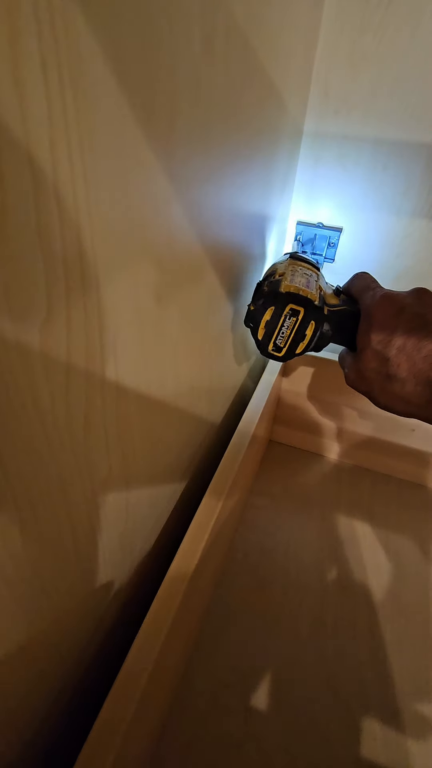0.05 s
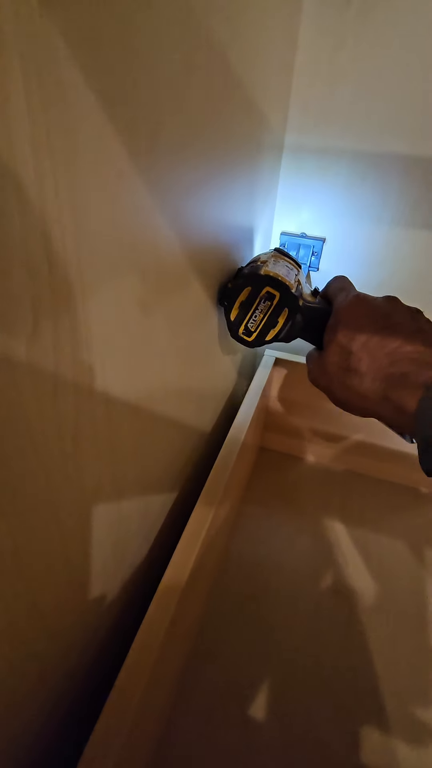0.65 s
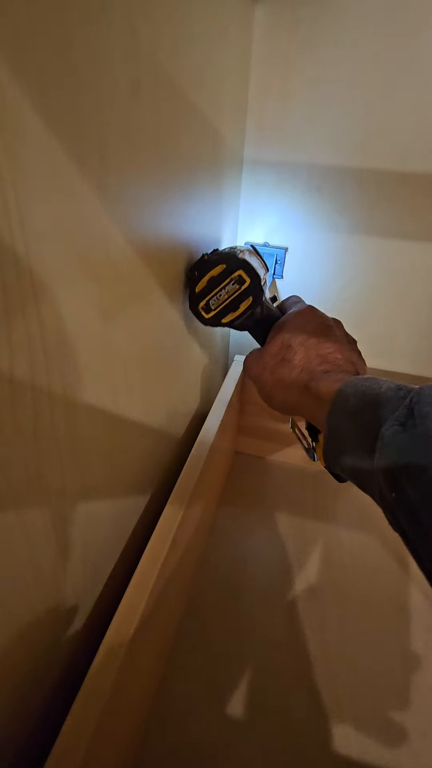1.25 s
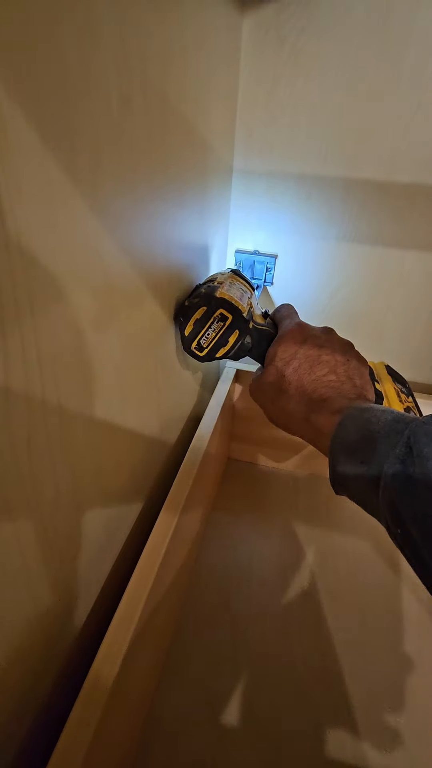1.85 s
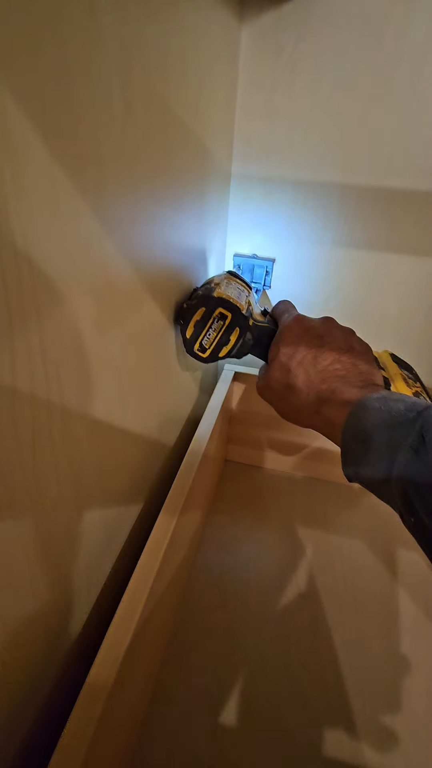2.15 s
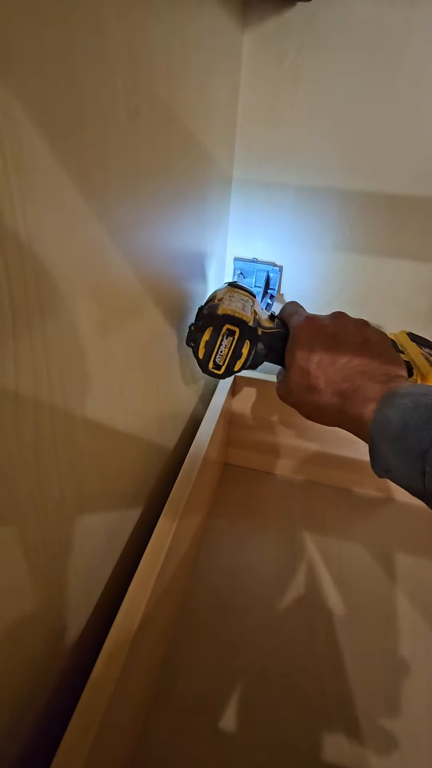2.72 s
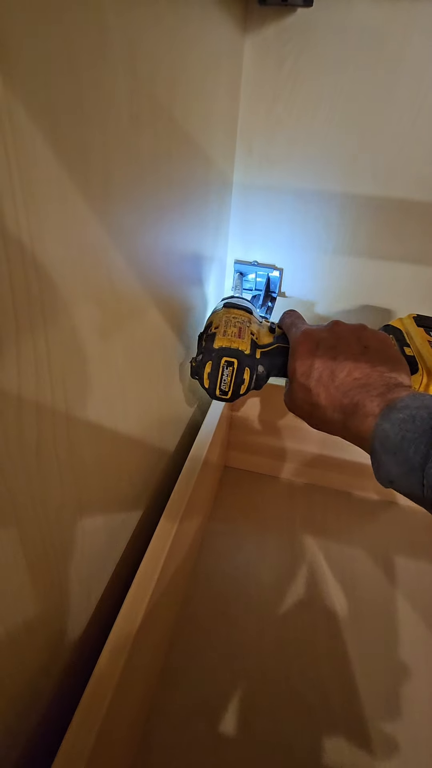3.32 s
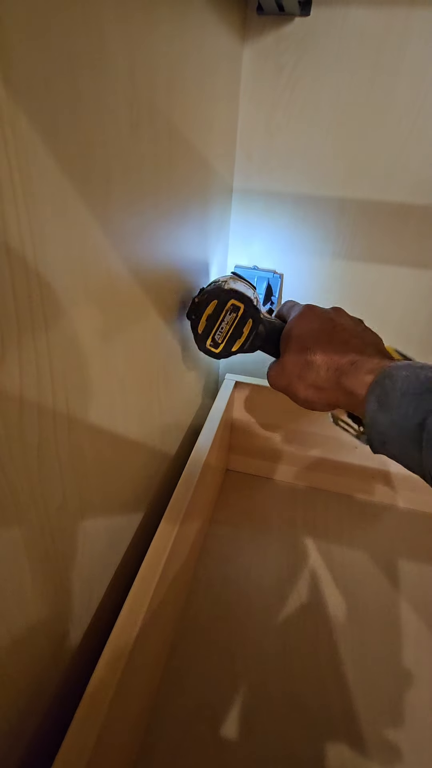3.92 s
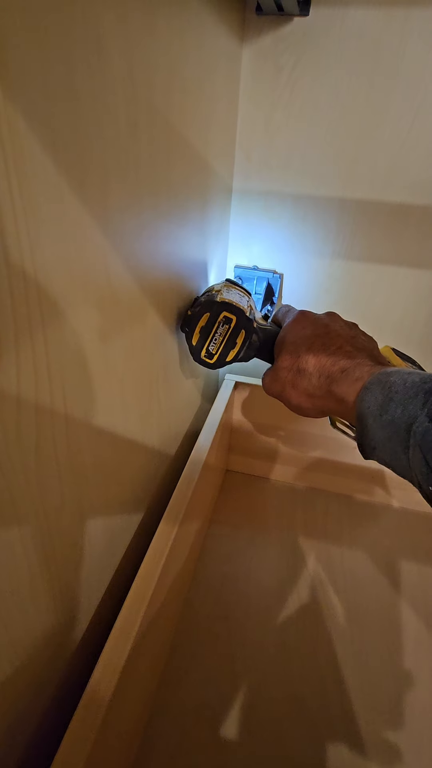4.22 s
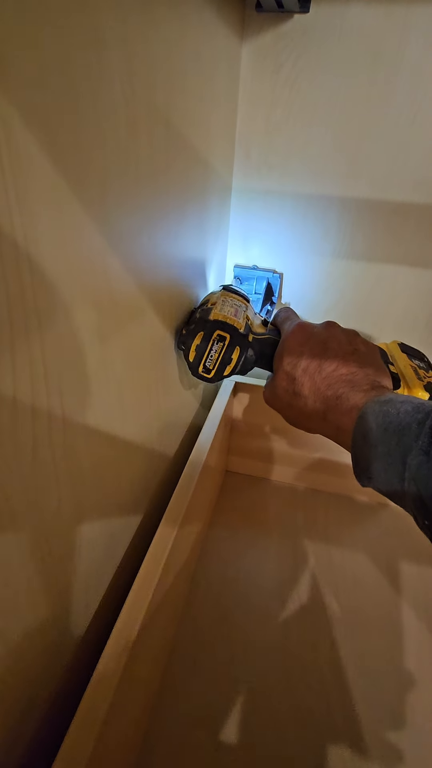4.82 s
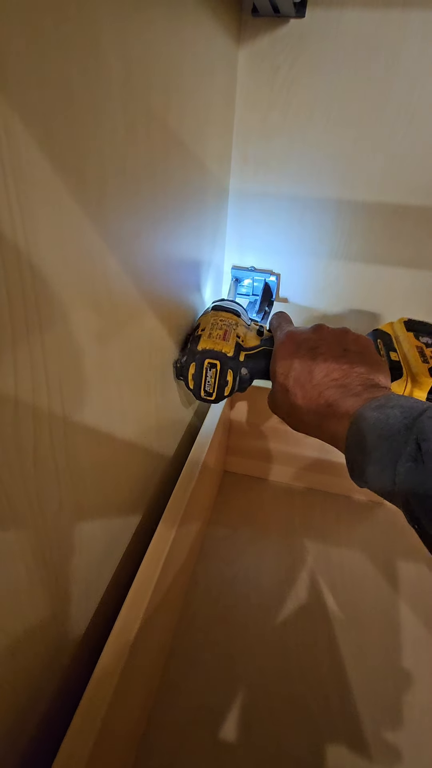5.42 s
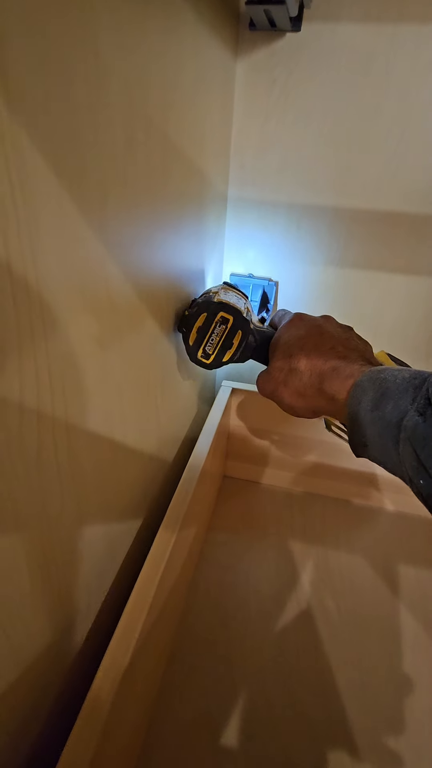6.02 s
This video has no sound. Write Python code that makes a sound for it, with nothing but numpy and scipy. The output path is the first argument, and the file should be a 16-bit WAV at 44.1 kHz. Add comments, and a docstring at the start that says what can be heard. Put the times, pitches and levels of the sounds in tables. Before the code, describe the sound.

Hollow bumps on wood and clicks of a loose steel drawer slide surround three brief pulls of a cordless screwdriver.

```python
"""A cordless driver backs screws out of a steel drawer slide, deep inside a wooden cabinet.
First the tool bumps and rubs the wood, the bit taps the bracket in search of the screw and the loose
slide clacks. The motor gives two short pulls, the bit scratches, and the rail slaps in its track.
The bit chafes in the screw head, a third pull runs faster and louder, and a few last knocks follow.
The touches ring panel, boards, rail, bracket and bit; the cabinet and a small room throw it all back."""
import sys
import numpy as np
from scipy import signal
from scipy.io import wavfile
from scipy.ndimage import uniform_filter1d

SR = 44100
rng = np.random.default_rng(int(sys.argv[2]) if len(sys.argv) > 2 else 0)


def store_pcm(level_fs):
    """Save levels as 16-bit WAV."""
    pcm = np.round(np.clip(level_fs, -1, 1) * 32767).astype(np.int16)
    wavfile.write(sys.argv[1], SR, np.atleast_2d(pcm).T)


N = 267687

# spectrum of a dead blow on heavy wood: freq_hz, level_db
THUD = [(25, -16), (55, 4), (130, 5.5), (220, -8.5), (400, -30), (1000, -77.5)]
# a harder touch favours light steel; share of the hardness for: panel, boards, rail, bracket, bit
LIGHTNESS = np.array([0, 0, .65, 1, 1])


def amp(db):
    """Decibels to gain."""
    return 10 ** (np.asarray(db) / 20)


def unit(x):
    """Scales to rms 1."""
    return x / np.sqrt(np.mean(x ** 2) + 1e-20)


def read(points, hz):
    """Reads (freq_hz, value) points on a log-frequency axis."""
    freqs, values = np.transpose(points)
    return np.interp(np.log(hz + 1), np.log(freqs + 1), values)


def add(mix, start_s, sound):
    """Lays a stereo sound into the mix."""
    part = mix[:, max(round(start_s * SR), 0):][:, :sound.shape[1]]
    part += sound[:, :part.shape[1]]


def drift(length, hz):
    """A random wander of rms 1 that turns hz times a second."""
    knots = rng.standard_normal(8192)
    return unit(np.interp(np.arange(length) * hz / SR, np.arange(len(knots)), knots))


def colour(spectrum, size=4096):
    """A minimum-phase click of energy 1 with the given spectrum."""
    log_gain = np.log(amp(read(spectrum, abs(np.fft.fftfreq(size, 1 / SR)))))
    click = np.fft.ifft(np.exp(np.conj(signal.hilbert(log_gain)))).real[:size // 2]
    return click / np.linalg.norm(click)


def convolve(x, response):
    """Plays a sound through a stereo response."""
    return signal.fftconvolve(np.atleast_2d(x), response, axes=1)


def room_tone(air_db=-54.5, width=0.28, hum_hz=48.6, hum_db=-47.5):
    """A still room with a low, distant hum."""
    # the dark noise bed: freq_hz, level_db
    bed = [(12, -33.5), (20, -5.5), (70, -3.5), (127, -10), (204, -21.5), (301, -14.5), (377, -27),
           (660, -28.5), (1290, -35), (3340, -46), (7310, -49), (10200, -65), (16000, -74.5)]
    noise = rng.standard_normal((3, N))
    centre, left, right = signal.fftconvolve(noise, colour(bed)[None], "same", axes=1)
    hum = np.sqrt(2) * np.sin(2 * np.pi * hum_hz * np.arange(N) / SR) * amp(drift(N, 1.7))
    return amp(air_db) * unit(centre + width * np.array([left, right])) + amp(hum_db) * hum


def echoes(decays, length_s, low_hz, attack_s=0.0022):
    """Dense stereo reflections of energy 1 above low_hz; each band dies at its own speed."""
    hz, t, bands = signal.stft(rng.standard_normal((2, int(length_s * SR))), SR, nperseg=256)
    bands = bands * amp(-60 * t / read(decays, hz)[:, None])
    tail = signal.istft(bands, SR, nperseg=256)[1]
    tail = signal.sosfilt(signal.butter(2, low_hz, "high", fs=SR, output="sos"), tail)
    tail = tail * np.minimum(np.arange(tail.shape[1]) / (attack_s * SR), 1)
    return tail / np.linalg.norm(tail, axis=1, keepdims=True)


def room_tail(sound, wet_db=-19):
    """The small room answers with a faint reverb."""
    # decay of the room: freq_hz, t60_s
    decays = [(300, 0.46), (800, 0.71), (1500, 0.51), (2500, 0.28), (5000, 0.27), (14000, 0.31)]
    return amp(wet_db) * convolve(sound, echoes(decays, length_s=.6, low_hz=350))[:, :N]


def boxed(sound, wet_db, left_db, low_hz=420):
    """The direct sound plus flutter between the close cabinet walls, normalised and panned."""
    # decay inside the cabinet: freq_hz, t60_s
    decays = [(400, 0.086), (1500, 0.08), (4000, 0.071), (14000, 0.047)]
    walls = amp(wet_db) * echoes(decays, .12, low_hz)
    walls[[0, 1], [0, 12]] += 1  # the direct sound reaches the right 12 samples late
    out = convolve(sound, walls)
    return out / np.linalg.norm(out, axis=1, keepdims=True) * amp([[left_db / 2], [-left_db / 2]])


def body(modes, dead_spectrum, dead_db, spot_db, detune):
    """A part's answer to a blow: a dead click and dying modes; spot and pressure vary mix and pitch."""
    longest_s = max(t60_s for *_, t60_s in modes)
    t = np.arange(max(int(longest_s * SR), 4096)) / SR
    ring = np.zeros(len(t))
    for k, (hz, db, t60_s) in enumerate(modes):
        spot, pressure = rng.standard_normal(2)
        mode = np.sin(2 * np.pi * hz * (1 + detune * pressure) * t)
        ring += (-1) ** k * amp(db + spot_db * spot - 60 * t / t60_s) * mode
    ring = ring / np.linalg.norm(ring)
    click = colour(dead_spectrum)
    ring[:len(click)] += amp(dead_db) * click
    return ring


def contact_spot():
    """Back panel, side boards, rail, bracket and bit as they answer at one point of contact."""
    # modes of each part: pitch_hz, level_db, t60_s
    panel = [(53.65, -5, 0.62), (62.3, -1, 0.54), (96.6, 3, 0.56), (106.6, -4, 0.27), (131, 3, 0.1),
             (181, -4.5, 0.11)]
    boards = [(236.8, -2.5, 0.07), (291.6, -0.5, 0.27), (351.8, -1.5, 0.17), (435.2, -9.5, 0.25),
              (485, 1.5, 0.033), (554, -17, 0.08), (575, -6, 0.069), (739, -2.5, 0.1), (770, -4.5, 0.058)]
    rail = [(905, 24, 0.022), (1093, 3.5, 0.11), (1412, 12, 0.13), (1505, 22.5, 0.046), (1958, -18, 0.02),
            (2116, -13.5, 0.21), (2270, 2, 0.019)]
    bracket = [(3700, 11.5, 0.067), (4330, -10, 0.036), (4980, -5, .045), (4910, 4, 0.025),
               (7820, 3.5, 0.065), (8650, -15, .04)]
    bit = [(13200, -19, .08), (13700, -6.5, .04), (13360, 14, 0.046), (15100, -11, .04)]
    # unpitched attack of boards, rail, bracket and bit: freq_hz, level_db
    clack = [(100, -53.5), (220, 2), (700, -6), (950, -14.5), (1600, -28), (6000, -71.5)]
    clank = [(400, -38.5), (900, -2), (2300, 2.5), (2900, -17), (4500, -17.5), (12000, -65)]
    click = [(1200, 1.5), (2700, 0), (4200, 2), (6500, -0.5), (9200, -4), (10500, -11), (15500, -7)]
    tink = [(10500, -59.5), (12300, -8), (13100, 2), (14200, 5.5), (14800, -22), (16000, -38)]
    return [
        boxed(body(panel, THUD, dead_db=-3.5, spot_db=8, detune=.022), wet_db=2.5, left_db=1.5),
        boxed(body(boards, clack, dead_db=-1, spot_db=2.5, detune=.023),
              wet_db=1, left_db=2, low_hz=504),
        boxed(body(rail, clank, dead_db=14, spot_db=-1, detune=.0076), wet_db=-4.5, left_db=.4),
        boxed(body(bracket, click, dead_db=14, spot_db=4, detune=.017), wet_db=12.5, left_db=2),
        boxed(body(bit, tink, dead_db=1, spot_db=6, detune=.01), wet_db=18, left_db=4)]


def struck(force, part, level_db):
    """A part driven by a force, so that its loudest 8 ms reach level_db."""
    sound = convolve(force, part)
    peak_power = uniform_filter1d((sound ** 2).mean(0), size=350).max()
    return amp(level_db) * sound / np.sqrt(peak_power + 1e-20)


def slips(t, per_s, spread_db):
    """Stick and slip: tiny releases of unequal size at random moments."""
    chance, size, sign = rng.random((3, SR))[:, :len(t)]
    return (chance < per_s / SR) * amp(spread_db * size) * np.sign(sign - .5)


def sliding(swell_s, swell_db=13):
    """The force of a slide: slips swell and fade around the hardest push, 2 * swell_s in."""
    t = np.arange(-2 * swell_s, 2 * swell_s, 1 / SR)
    return slips(t, per_s=2600, spread_db=21) * amp(-swell_db * abs(t / swell_s) ** 1.19)


def scrapes(spots, strokes, share_db, lead_s=.004):
    """Steel is pushed along steel or wood, and every part answers the slips."""
    out = np.zeros((2, N))
    for peak_s, swell_s, strength_db, hardness_db in strokes:
        force = sliding(swell_s)
        levels_db = strength_db + np.array(share_db) + hardness_db * LIGHTNESS
        parts = spots[rng.integers(len(spots))]
        for part, db in zip(parts, levels_db):
            add(out, peak_s - 2 * swell_s - lead_s, struck(force, part, db))
    return out


def knocks(spots, hits, share_db, skid_db, chatter=0.49, settle_s=0.0065, skid_s=.013, dull_db=-7.5):
    """A blow, a brief chatter and a duller skid; the lighter the part, the more it chatters."""
    # the arm's weight goes into the panel alone; share for: panel, boards, rail, bracket, bit
    bearing = np.array([1, 0, 0, 0, 0])
    out, t = np.zeros((2, N)), np.arange(1024) / SR
    blow = 1. * (t == 0)
    for start_s, strength_db, hardness_db, weight_db in hits:
        levels_db = strength_db + np.array(share_db) + hardness_db * LIGHTNESS + weight_db * bearing
        skid = sliding(skid_s)[round(skid_s * SR):]  # peaks skid_s after the blow
        rattle = slips(t, per_s=1700, spread_db=12.5) * np.exp(-t / settle_s)
        rattle = rattle / (np.linalg.norm(rattle) + 1e-9)
        parts = spots[rng.integers(len(spots))]
        for k, (part, db) in enumerate(zip(parts, levels_db)):
            add(out, start_s, struck(blow + chatter * np.sqrt(k) * rattle, part, db))
            add(out, start_s, struck(skid, part, db + skid_db + dull_db * LIGHTNESS[k]))
    return out


def cabinet_shoves():
    """Soft, heavy shoves rock the whole carcass in its lowest modes."""
    # modes of the carcass: pitch_hz, level_db, t60_s
    modes = [(49.9, -1, 0.6), (63.7, 1, 0.34), (92.9, -1.5, 0.23)]
    # shoves: start_s, level_db
    shoves = [(0.463, -11), (2.767, -15), (3.921, -14.5), (5.739, -27.5)]
    out = np.zeros((2, N))
    carcass = boxed(body(modes, THUD, dead_db=-18, spot_db=0, detune=0), wet_db=-2.5, left_db=1.5)
    for start_s, level_db in shoves:
        add(out, start_s, struck(np.ones(1), carcass, level_db))
    return out


def tool_rubs(spots):
    """The tool drags along wood and slide with a low, grainy rub; the last, longer rub near 5.97 s is a sleeve
    brushing the wood."""
    # rubs: peak_s, swell_s, strength_db, hardness_db
    strokes = [(0.147, 0.05, -52.5, -4), (0.348, 0.059, -55, 5), (0.514, 0.034, -31.5, 4.5),
               (1.077, 0.048, -30.5, -5), (1.129, 0.04, -25.5, 1), (1.347, 0.11, -34, -8),
               (1.856, .018, -29, -9), (1.91, 0.016, -29, -11), (2.695, 0.11, -47, -10.5),
               (3.402, 0.056, -44, 1), (3.498, 0.024, -44, -5), (3.581, 0.035, -40.5, -3.5),
               (4.026, .016, -34, 1.5), (4.134, .025, -31, -14), (4.269, 0.13, -42, 5),
               (5.054, 0.087, -48, -6.5), (5.179, 0.03, -59.5, 11), (5.615, 0.027, -39.5, 4.5),
               (5.829, 0.038, -48.5, 7.5), (5.969, 0.06, -31.5, 2)]
    # balance: panel_db, boards_db, rail_db, bracket_db, bit_db
    share_db = (6.5, 2.5, -3, -12, -47.5)
    return scrapes(spots, strokes, share_db)


def tool_bumps(spots):
    """The tool bumps the wood, and mostly the back panel booms."""
    # bumps: start_s, strength_db, hardness_db, weight_db
    hits = [(0.466, -20, -2, -5), (0.75, -30.5, 0, 5.5), (0.91, -37.5, 13, 7), (1.022, -30, -1, -2),
            (1.603, -27.5, -7, -7), (1.705, -18, -3, -9.5), (1.881, -18.5, -4.5, -4.5),
            (2.112, -34.5, -2, 11), (2.143, -11.5, -3, -11), (2.632, -9.5, 0, -19),
            (4.161, -20.5, -6.5, 2.5), (4.343, -32.5, -11.5, 3), (5.852, -23.5, -5.5, 1.5)]
    # balance: panel_db, boards_db, rail_db, bracket_db, bit_db
    share_db = (6.5, 0.5, -15, -20.5, -47)
    return knocks(spots, hits, share_db, skid_db=-10)


def bracket_clacks(spots):
    """The slide's loose bracket clacks against the cabinet."""
    # clacks: start_s, strength_db, hardness_db, weight_db
    hits = [(0.42, -27.5, 13, -7), (1.257, -26, 7.5, 5.5), (1.445, -24.5, 5.5, -1.5), (2.516, -20.5, 6, 5),
            (2.626, -17.5, 3.5, -6.5), (3.469, -34.5, -8, -14), (3.547, -36.5, -3.5, -20),
            (4.084, -11.5, 2.5, 1.5), (4.521, -16, 2.5, 4), (5.137, -40.5, 0, -3.5), (5.397, -38.5, 0, -3),
            (5.672, -34, 18, -16), (5.701, -21.5, 4, 2)]
    # balance: panel_db, boards_db, rail_db, bracket_db, bit_db
    share_db = (0, -0.5, -5, -8.5, -31)
    return knocks(spots, hits, share_db, skid_db=-6)


def rail_slaps(spots):
    """The long rail slaps in its track with a midrange clank."""
    # slaps: start_s, strength_db, hardness_db, weight_db
    hits = [(2.766, -12, -10.5, 4), (2.897, -18.5, 4.5, -5.5), (3.351, -25.5, -1, -7),
            (4.008, -30, -5.5, -9)]
    # balance: panel_db, boards_db, rail_db, bracket_db, bit_db
    share_db = (-3, 0.5, 2, -15.5, -28)
    return knocks(spots, hits, share_db, skid_db=-6)


def bit_taps(spots):
    """The tip of the bit taps the bracket: a bright tick over the knock of the wood."""
    # taps: start_s, strength_db, hardness_db, weight_db
    hits = [(0.062, -36, -8, -7), (0.385, -27.5, -9.5, 1), (1.09, -11.5, -8.5, -1), (1.175, -20, -5.5, 5),
            (2.185, -35, -0.5, 10), (2.397, -25, -2.5, -11), (2.444, -19.5, -0.5, 9),
            (2.858, -20, -11.5, -16), (3.697, -30, 10.5, -21), (3.819, -51.5, 12, 8), (3.844, -47, 9, -14),
            (3.923, -46, 1, 22), (4.197, -27.5, 1.5, 9), (4.331, -45.5, 6, 10.5), (4.482, -15.5, -2, 0.5),
            (5.001, -52, 1, 9), (5.477, -18.5, 0.5, 1), (5.628, -27, -1, 11), (5.735, -21, -8.5, 6.5)]
    # balance: panel_db, boards_db, rail_db, bracket_db, bit_db
    share_db = (2, -0.5, -2, -2.5, -11)
    return knocks(spots, hits, share_db, skid_db=-8)


def bit_scratches(spots):
    """The bit scratches over the steel as it seeks the screw."""
    # scratches: peak_s, swell_s, strength_db, hardness_db
    strokes = [(2.082, 0.017, -23, 1.5), (2.122, 0.025, -27.5, 0.5), (2.24, .028, -25.5, -5),
               (2.437, 0.033, -22.5, 0), (2.497, .026, -25, 4.5), (2.878, .025, -27, -4.5),
               (3.716, .014, -24, -2.5), (5.738, .038, -31, 1.5)]
    # balance: panel_db, boards_db, rail_db, bracket_db, bit_db
    share_db = (2.5, 1.5, -5, -5.5, -10)
    return scrapes(spots, strokes, share_db)


def bit_chafes(pitch_hz=4020, t60_s=.014, fade_s=0.0097):
    """The bit sticks and slips in the screw head: short, gritty squeaks."""
    # squeaks: start_s, level_db
    squeaks = [(4.249, -38), (4.281, -40), (4.31, -42), (4.332, -39.5), (4.356, -42.5), (4.398, -43.5),
               (5.673, -30), (5.826, -44)]
    out, t = np.zeros((2, N)), np.arange(2048) / SR
    ring = amp(-60 * t / t60_s) * np.sin(2 * np.pi * pitch_hz * t)
    bit = boxed(ring, wet_db=-3.5, left_db=4)
    for start_s, level_db in squeaks:
        force = slips(t, per_s=2800, spread_db=3.5) * np.exp(-t / fade_s)
        add(out, start_s, struck(force, bit, level_db))
    return out


def gear_hiss(noise, turns, brightness, throb=0.9, grit_db=2.5, dull_hz=5500):
    """Grinding teeth throb once per shaft turn; slow teeth meet softly and sound duller."""
    grind = noise * (1 + throb * np.cos(2 * np.pi * turns)) * amp(grit_db * drift(len(turns), 700))
    soft = signal.lfilter(*signal.butter(1, dull_hz, fs=SR), grind)
    return unit(soft + brightness * (grind - soft))


def gear_whine(turns, flutter_db=2):
    """Meshing teeth sing at multiples of the shaft speed."""
    # mesh tones: shaft_multiple, level_db
    tones = [(6, -11), (9, -14), (15, -13), (21, -13), (31, -17)]
    return sum(amp(db + flutter_db * drift(len(turns), 43)) * np.sqrt(2) * np.sin(2 * np.pi * k * turns)
               for k, db in tones)


def board_hum(turns, speed_hz, flutter_db=3):
    """Six harmonics of the shaft pass through the bit into the boards."""
    # how well the bit passes the shake: freq_hz, gain_db
    mount = [(140, -14), (230, -13), (293, 10), (360, -0.5), (460, -10.5), (620, -22), (750, -24),
             (1000, -34.5)]
    hum = np.zeros(len(turns))
    for k in range(1, 7):
        level_db = read(mount, k * speed_hz) + flutter_db * drift(len(turns), 45)
        hum += amp(level_db) * np.sin(2 * np.pi * k * turns)
    return unit(hum)


def shake_db(speed_hz, best_hz, peak_db, db_per_octave):
    """Wood shakes most at one shaft speed and less to either side."""
    return peak_db - db_per_octave * abs(np.log2(speed_hz / best_hz))


def driver(parts, waver=0.018, fast_hz=260, whine_cap_db=-29, low_cut_hz=86, hum_gain=1.5,
           usual_load_db=-30, load_share=0.4):
    """Gears hiss and whine; the unbalance shakes the cabinet, the more so the firmer the bit grips."""
    # one curve per trigger pull: time_s, speed_hz, load_db, grip_db
    pulls = [
        [(1.44, 155, -36.5, 2.5), (1.54, 130, -35.5, 3), (1.605, 155, -35.5, 2), (1.64, 134, -38, 4),
         (1.71, 160, -36, 1.5), (1.78, 146, -37.5, -2), (1.84, 131, -39.5, -3), (1.875, 154, -57, 8.5),
         (1.94, 125, -48, 4), (1.98, 140, -73, -9)],
        [(2.19, 117, -55, -12), (2.22, 134, -30, 3), (2.26, 177, -49, -11), (2.295, 150, -54.5, 2.5),
         (2.34, 137, -55, 3), (2.38, 88, -66, -2)],
        [(4.465, 84, -31.5, 0), (4.5, 170, -15, 0), (4.555, 236, -17.5, 1.5), (4.595, 263, -25, 0.5),
         (4.68, 281, -27, 3.5), (4.77, 293, -27.5, 2), (4.82, 260, -22, 5.5), (4.885, 290, -26.5, 0.5),
         (4.925, 148, -63.5, 2), (4.99, 45, -75.5, 1.5)],
    ]
    # spectrum of the gear noise: freq_hz, level_db
    gears = [(410, -23.5), (700, -23), (1120, -8.5), (1180, -9), (1680, -7), (1920, -8.5), (2730, -11),
             (4100, -7), (7790, -9), (9230, -7), (10400, -18), (14000, -10), (16000, -16)]
    out = np.zeros((2, N))
    housing = boxed(colour(gears), wet_db=5, left_db=2.5)
    air = boxed(np.ones(1), wet_db=4, left_db=-1.5)
    for pull in pulls:
        times, *curves = np.transpose(pull)
        t = np.arange(times[0], times[-1], 1 / SR)
        speed_hz, load_db, grip_db = (np.interp(t, times, curve) for curve in curves)
        turns = np.cumsum(speed_hz * (1 + waver * drift(len(t), 200))) / SR
        brightness = np.clip(speed_hz / fast_hz, 0, 1) ** 2
        grind, rumble = rng.standard_normal((2, N))[:, :len(t)]

        hiss = amp(load_db) * gear_hiss(grind, turns, brightness)
        add(out, t[0], convolve(hiss, housing))
        # hard grinding adds noise but no more whine
        whine = amp(np.minimum(load_db, whine_cap_db)) * gear_whine(turns)
        add(out, t[0], convolve(whine, air))

        # at low speed the bit sits tight and the boards hum; at high speed it rattles
        hum = hum_gain * (1 - .5 * brightness) * board_hum(turns, speed_hz)
        rumble = signal.sosfilt(signal.butter(4, low_cut_hz, "high", fs=SR, output="sos"), rumble)
        panel, boards = (unit(convolve(rumble, part)[:, :len(t)]) for part in parts[:2])
        panel_db = shake_db(speed_hz, best_hz=300, peak_db=-21.5, db_per_octave=13)
        boards_db = shake_db(speed_hz, best_hz=152, peak_db=-25, db_per_octave=6.5)
        boards_db += load_share * (load_db - usual_load_db)
        shake = amp(panel_db) * panel + amp(boards_db) * unit(boards + hum)
        add(out, t[0], amp(grip_db) * shake * signal.windows.tukey(len(t), .05))
    return out


def scene():
    """Knocks and scrapes each land on one of twelve spots; the driver runs among them in the room."""
    spots = [contact_spot() for _ in range(12)]
    blows = tool_bumps(spots) + bracket_clacks(spots) + rail_slaps(spots) + bit_taps(spots)
    slides = tool_rubs(spots) + bit_scratches(spots)
    near = blows + slides + cabinet_shoves() + bit_chafes() + driver(spots[0])
    return near + room_tail(near) + room_tone()


def record(dry, low_cut_hz=36, ceiling=.95, high_cut_hz=15650):
    """The microphone sheds the lowest rumble and rounds off the peaks; a steep filter trims the top."""
    thin = signal.sosfilt(signal.butter(2, low_cut_hz, "high", fs=SR, output="sos"), dry)
    rounded = thin / (1 + (thin / ceiling) ** 6) ** (1 / 6)
    high_cut = signal.firwin(255, high_cut_hz, window=("kaiser", 8), fs=SR)
    return signal.oaconvolve(rounded, high_cut[None], "same")


dry = scene()
out = record(dry)
store_pcm(out)
```